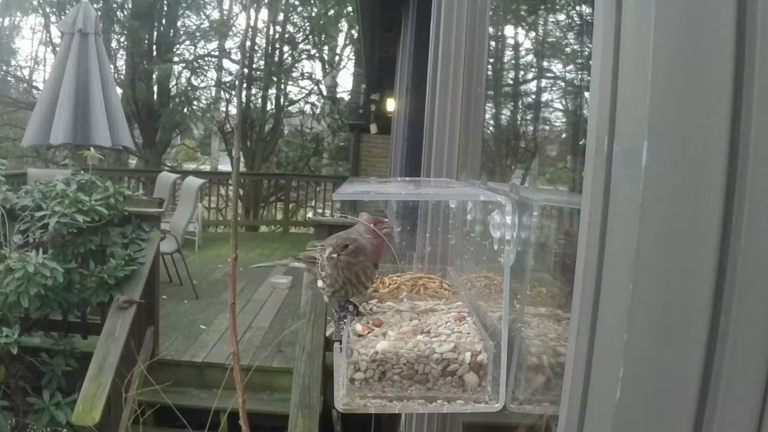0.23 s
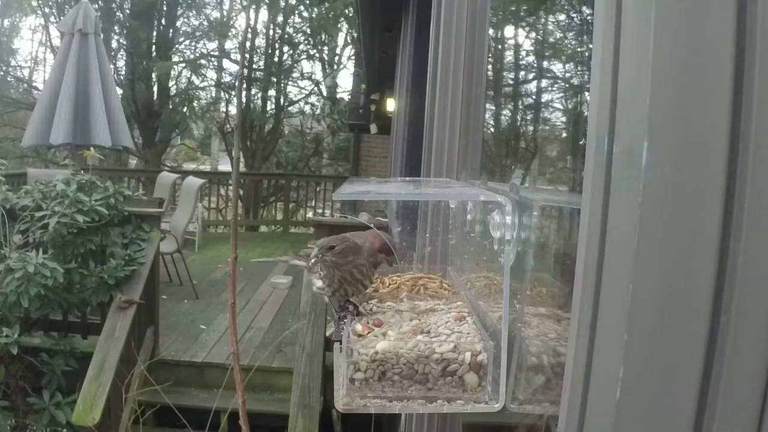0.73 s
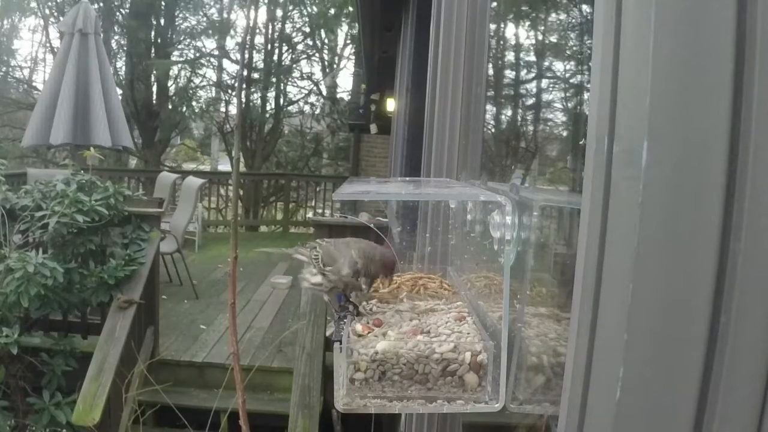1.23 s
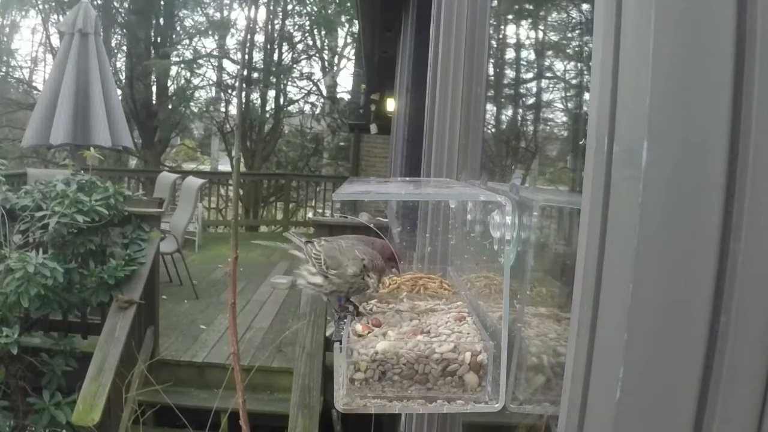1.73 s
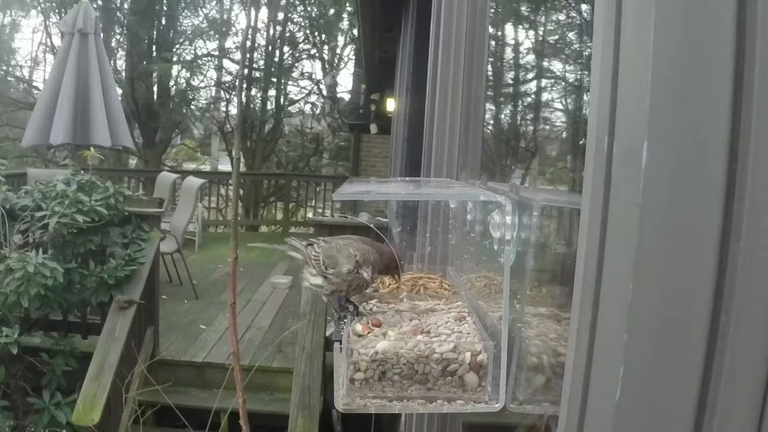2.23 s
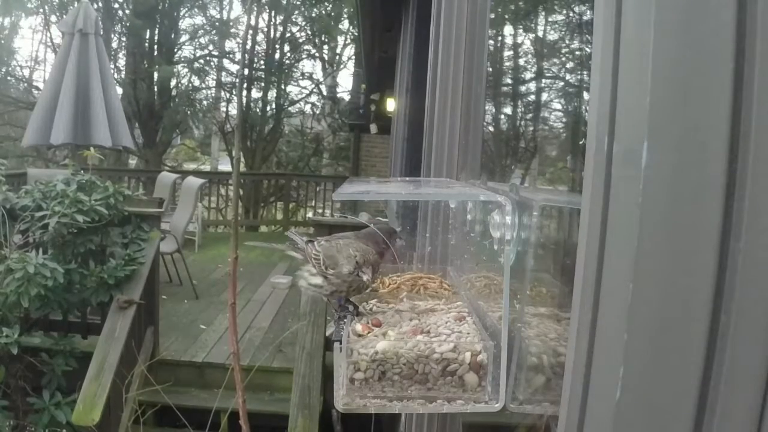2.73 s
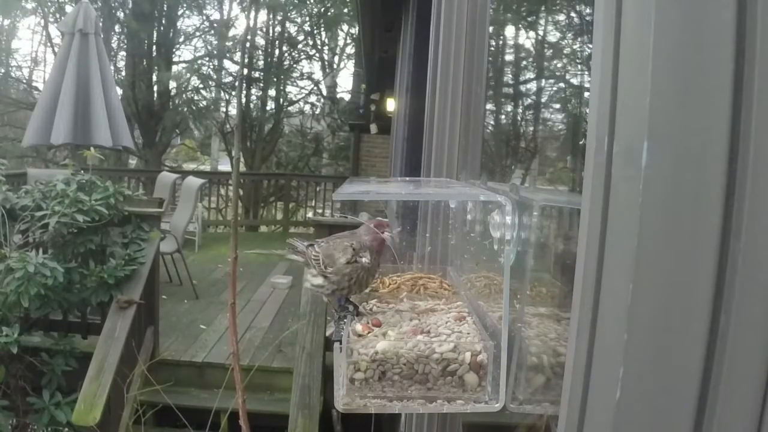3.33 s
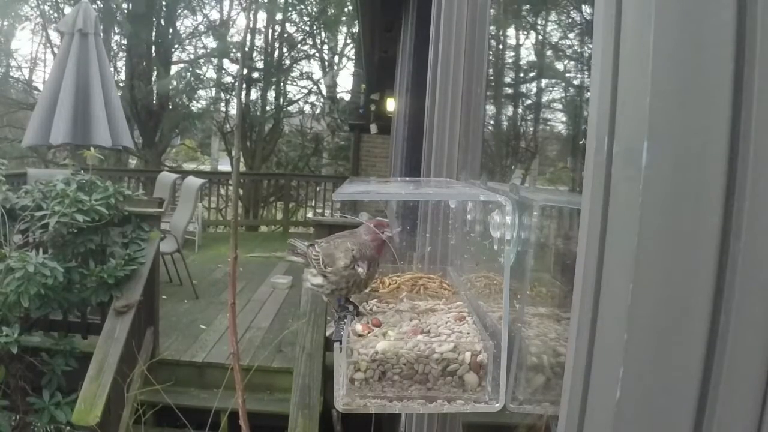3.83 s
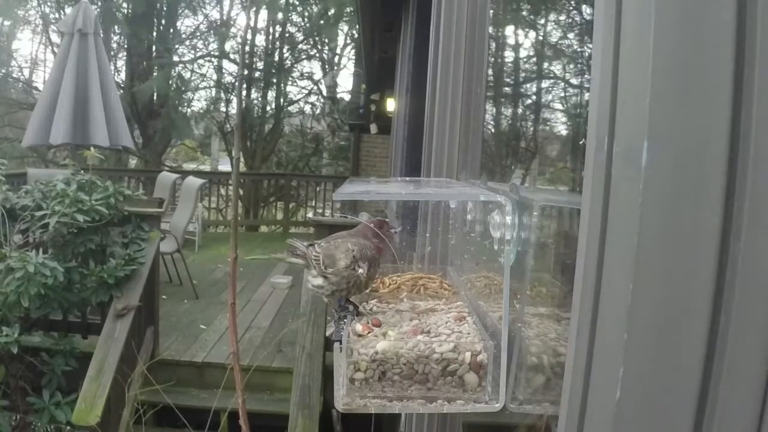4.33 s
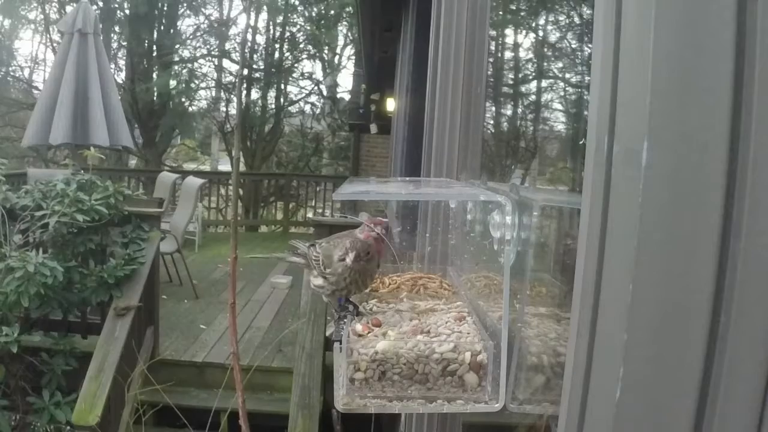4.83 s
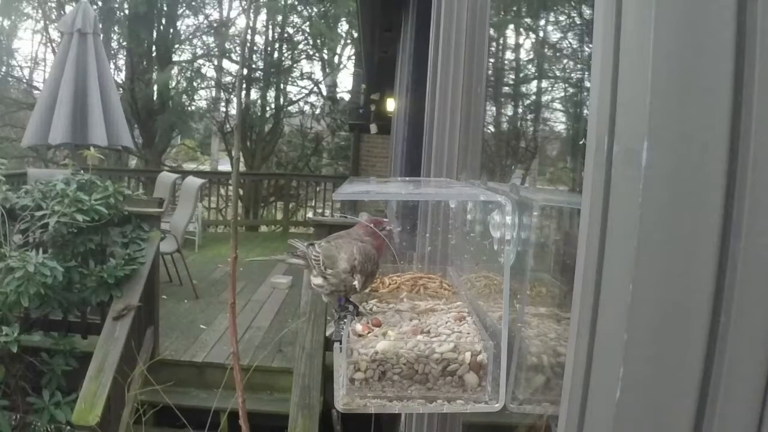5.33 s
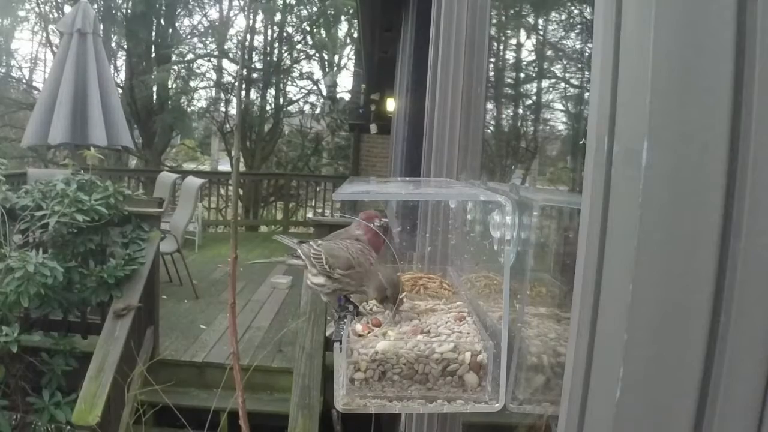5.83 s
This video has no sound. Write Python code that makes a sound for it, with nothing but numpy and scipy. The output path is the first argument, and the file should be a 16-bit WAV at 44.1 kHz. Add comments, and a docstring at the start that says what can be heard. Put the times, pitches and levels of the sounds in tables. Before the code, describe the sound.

Throughout, a low motor hum and dull indoor air sit quietly behind a close plastic seed tray. At about 0.1 s a sharp beak tap lands, with two more near 0.27 s and tiny ticks around them. A very short, soft gliding chirp comes at 1.26 s, while a low rumble rises, peaks near 1.95 s and fades by 2.7 s. Light seed ticks patter from 1.8 s and at 2.4 s. From 2.6 to 2.7 s comes a tight burst of hard pecks and gritty scrapes, with a brief plastic ring. A short scrape with ticks follows at 3.4 s, then barely audible high chirps at 3.9 s and loose ticks from 4.0 s. Scraping builds from 4.28 s to the loudest crack at 4.39 s, then more scrapes and pecks until 4.57 s. The background ducks and recovers; a tick at 5.14 s and an almost inaudible falling chirp at 5.9 s finish.

```python
"""A finch feeds in a clear plastic tray stuck to a window, heard from indoors over motor hum and room air.
Sharp pecks open the scene; light ticks follow, then a gliding chirp and a low rumble that swells and fades.
Pecks and scrapes return in two denser bursts, with tiny high chirps in between; a last faint chirp ends it.
Contacts are short forces ringing the tray's modes, the free roof is one slow mode, chirps are gliding tones.
The recorder's gain ducks when a bright peak passes its ceiling, then creeps back."""
import sys
import numpy as np
from scipy import signal
from scipy.fft import rfft, irfft
from scipy.io import wavfile
from scipy.ndimage import uniform_filter1d, minimum_filter1d

SR = 44100
rng = np.random.default_rng(int(sys.argv[2]) if len(sys.argv) > 2 else 0)


def store_wav(level_fs):
    """Save 16-bit WAV to argv[1]."""
    pcm = np.round(np.clip(np.atleast_2d(level_fs), -1, 1) * 32767)
    wavfile.write(sys.argv[1], SR, pcm.T.astype(np.int16))


N = 267951
TIME = np.arange(N) / SR
CUTOFF_HZ = 15600   # the recorder's steep top cut


def from_db(db):
    """Turn decibels into an amplitude factor."""
    return 10 ** (np.asarray(db) / 20)


def rms_one(x):
    """Scale a steady sound to rms 1."""
    return x / np.sqrt(np.mean(x ** 2) + 1e-20)


def unit_energy(x):
    """Scale a short sound to a summed energy of 1."""
    return x / np.sqrt(np.sum(x ** 2) + 1e-20)


def add(track, start_s, sound):
    """Mix a sound into the track at the given time."""
    at = int(round(start_s * SR))
    track[at:at + len(sound)] += sound[:N - at]


def band(x, hz, kind, order=2):
    """Causal Butterworth filter."""
    return signal.sosfilt(signal.butter(order, hz, kind, fs=SR, output="sos"), x)


def coloured_noise(spectrum):
    """Noise of rms 1 whose spectrum joins the given points."""
    hz, level_db = np.transpose(spectrum)
    bins_hz = np.maximum(np.arange(N // 2 + 1) * SR / N, 1)
    curve_db = np.interp(np.log(bins_hz), np.log(hz), level_db)
    white = rfft(rng.standard_normal(N))
    return rms_one(irfft(white * from_db(curve_db), N))


def drift(per_s):
    """A slow random wander of spread 1, with the given number of turning points per second."""
    return rms_one(np.interp(TIME * per_s, np.arange(400), rng.standard_normal(400)))


# Colour of the room's air. Each row: frequency in Hz, density in relative dB.
AIR_SPECTRUM = [(15, -4), (30, -4), (95, -4.5), (140, -1), (195, -8.5), (390, -12.5), (480, -6),
                (570, -14.5), (1020, -10), (1400, -30.5), (2000, -27.5), (2800, -37), (6200, -39.5),
                (13500, -55)]
AIR_DB = -39   # rms level before the top is rolled off


def room_air(top_hz=14300):
    """Steady coloured noise with its top rolled off stands for the air of the room."""
    return from_db(AIR_DB) * band(coloured_noise(AIR_SPECTRUM), top_hz, "low", order=6)


# Hum of a motor indoors. Each row: frequency in Hz, mean level in dB rms.
MOTOR_HUM = [(119, -54), (131.5, -51), (236.2, -48), (304, -60.5), (400, -60)]


def motor_hum(waver_db=1.4, wander_rad=0.58):
    """Each hum tone wavers slowly and independently in level and phase."""
    hum = np.zeros(N)
    for hz, db in MOTOR_HUM:
        level = np.sqrt(2) * from_db(db + waver_db * drift(5.045))   # root 2 turns rms into peak
        hum += level * np.sin(2 * np.pi * hz * TIME + wander_rad * drift(6))
    return hum


# Swell of the low rumble. Each row: time in seconds, level in dB rms.
RUMBLE_SWELL = [(0, -61.5), (1.2, -47), (1.6, -45), (1.95, -38), (2.3, -45.5), (2.7, -54), (6.08, -70)]


def rumble():
    """Low band-passed noise swells and fades."""
    noise = rms_one(band(rng.standard_normal(N), [22, 105], "band"))
    return from_db(np.interp(TIME, *np.transpose(RUMBLE_SWELL))) * noise


# Small chirps. Each row: start in seconds, length in seconds, start, middle and end pitch in Hz, level in dB.
CHIRP_GLIDES = [(1.263, 0.034, 2350, 3110, 2900, -48.5), (3.876, .022, 6300, 7000, 7200, -65),
                (3.924, .030, 8000, 7850, 7700, -64), (5.914, 0.1, 4180, 3740, 3250, -73)]
# Overtones of a chirp. Each row: multiple of the pitch, level in dB against the chirp's level.
CHIRP_OVERTONES = [(1, 2), (2, -9), (3, -6.5)]


def chirps():
    """Short whistles glide through three pitches, with overtones, under a half-sine swell."""
    out = np.zeros(N)
    for s, length_s, start_hz, middle_hz, end_hz, db in CHIRP_GLIDES:
        u = np.linspace(0, 1, int(length_s * SR))   # progress through the chirp
        glide = np.polyfit([0, .5, 1], [start_hz, middle_hz, end_hz], 2)
        phase = 2 * np.pi * np.cumsum(np.polyval(glide, u)) / SR
        tone = np.zeros(len(u))
        for multiple, tone_db in CHIRP_OVERTONES:
            if multiple * middle_hz < 10000:
                tone += from_db(tone_db) * np.sin(round(multiple) * phase)
        add(out, s, from_db(db) * np.sin(np.pi * u) * tone)
    return out


# Modes of the tray, damped by its load of seed.
# Each row: central frequency in Hz, central strength in relative dB, decay by 60 dB in seconds.
TRAY_MODES = [(380, -16, 0.011), (604, -9, 0.015), (821, -4.5, 0.027), (958, -3, 0.034), (1092, -1.5, 0.01),
              (1578, -0.5, 0.019), (2072, -2, 0.024), (2306, -4, 0.013), (2692, -4, 0.024),
              (3013, -2, 0.015), (3600, -1, 0.013), (4345, -1, 0.0073), (4940, -1.5, .017),
              (5550, -3, 0.016), (6065, 0.5, 0.0083), (7020, -1, 0.0035), (9020, -2.5, 0.0044),
              (9930, -3, 0.0044), (11540, -5, 0.0034), (13140, -6.5, .002)]


def tray_response(pitch_hz, favour_db=7.5, favour_octaves=0.26, vary_db=1.5, detune=0.021, snap=0.99,
                  tail_db=-17.0, tail_t60=0.049, tail_hz=4500):
    """The tray's answer to one touch: the place of contact favours the modes near one pitch."""
    t = np.arange(SR // 4) / SR
    hz, level_db, t60 = np.transpose(TRAY_MODES)[:, :, None]
    near = np.exp(-(np.log2(hz / pitch_hz) / favour_octaves) ** 2)
    strength = from_db(level_db + favour_db * near + vary_db * rng.standard_normal(hz.shape))
    loaded_hz = hz * (1 + detune * rng.standard_normal(hz.shape))   # shifting seed pulls the modes
    sign = (-1) ** np.arange(len(hz))[:, None]
    ringing = sign * strength * np.sin(2 * np.pi * loaded_hz * t) * from_db(-60 * t / t60)
    modes = np.sum(ringing, axis=0)
    modes[0] += snap   # the contact itself
    # reflections between pane and walls leave a short, dull tail
    tail = band(rng.standard_normal(len(t)), tail_hz, "low")
    tail *= from_db(-60 * t / tail_t60) * (1 - np.exp(-t / 0.0014))
    return unit_energy(modes) + from_db(tail_db) * unit_energy(tail)


# Edges between thud, knock, clack, crack and sizzle. Each entry: frequency in Hz.
EDGES_HZ = [1250, 2450, 3900, 7500]


def sound_tray(force, pitch_hz, register_db):
    """Ring the tray with a force, split it into five registers and set their levels around the knock."""
    rest = signal.fftconvolve(force, tray_response(pitch_hz))
    registers = []
    for edge_hz in EDGES_HZ:
        # both halves of a crossover are filtered twice to stay in phase
        registers.append(band(band(rest, edge_hz, "low"), edge_hz, "low"))
        rest = band(band(rest, edge_hz, "high"), edge_hz, "high")
    registers.append(band(rest, EDGES_HZ[-1], "high"))
    thud_db, *upper_db = register_db
    levels_db = [thud_db, 0, *upper_db]   # the knock is the reference
    return sum(from_db(db) * unit_energy(part) for db, part in zip(levels_db, registers))


# Clack, crack and sizzle of a contact.
# Each row: base level in dB against the knock, dB gained per dB of hardness.
UPPER_LEVELS = [(-2.5, 0.29), (-4, 1), (-15, 1.49)]
CLACK_DB_PER_OCTAVE, WALL_HZ = 11.5, 1930   # a spot tuned above the wall's usual pitch clacks more


def registers_db(pitch_hz, thud_db, hardness_db):
    """The harder the contact, the more it lifts the upper registers, the highest most."""
    clack, crack, sizzle = (db + share * hardness_db for db, share in UPPER_LEVELS)
    clack += CLACK_DB_PER_OCTAVE * np.log2(pitch_hz / WALL_HZ)
    return thud_db, clack, crack, sizzle


def taps(rows, chatter=0.69, chatter_s=0.00075, blow_hz=6000, level_db=0.0):
    """Each tap is one slightly soft blow; bright chatter swells and dies in the next few milliseconds."""
    out = np.zeros(N)
    t = np.arange(SR // 100) / SR
    blow = unit_energy(band(signal.unit_impulse(len(t)), blow_hz, "low"))
    for s, db, pitch_hz, thud_db, hardness_db in rows:
        rattle = unit_energy(rng.standard_normal(len(t)) * t * np.exp(-t / chatter_s))
        colour = registers_db(pitch_hz, thud_db, hardness_db)
        sound = sound_tray(blow + chatter * rattle, pitch_hz, colour)
        add(out, s, from_db(db + level_db) * np.sqrt(len(t)) * sound)   # knock level counts over 10 ms
    return out


# Light ticks of seed, husks and claws. Each row: start in seconds, knock in dB over 10 ms before the
# tick trim, thud in dB against the knock, hardness in dB.
LIGHT_TICKS = [(0.2265, -42, 2, -2), (0.2328, -42.5, 0, 1.5), (0.2884, -44.5, -7, 12),
               (0.2975, -46, -14, -6), (1.2643, -50, 4, -2), (1.296, -50.5, -1, 1.5),
               (1.519, -53.5, -7, 0.5), (1.7969, -38, -4, -9.5), (1.8164, -43.5, 0, -10),
               (1.835, -37.5, -6, -8.5), (1.9175, -42.5, 4.5, -3.5), (2.39, -35, -3, -3.5),
               (2.405, -35.5, -9, -5.5), (2.414, -41.5, 1, -1), (2.424, -34.5, -18, -3.5),
               (2.47, -49.5, -4, 1), (2.59, -44, 2, 5), (2.6, -44, -6, 1), (2.6384, -42, -6, 4),
               (2.76, -43, 7, -11), (2.773, -44, 9.5, -7), (2.8815, -45, -17, -18), (3.047, -50, 3, -8),
               (3.4544, -36, -9, -10), (3.467, -41, -16, -5), (3.476, -37.5, -20, -11),
               (3.806, -43.5, 5, -6.5), (3.816, -43.5, 7.5, -3.5), (4.009, -36.5, 2.5, -5),
               (4.044, -40, 5.5, -7), (4.115, -44.5, 11, -2.5), (4.122, -47, 8, -6),
               (4.16, -44.5, 2.5, -6.5), (4.227, -39.5, 1, -7), (5.1373, -39, -16, -7),
               (5.961, -51, -7, -14)]
TICK_HZ = 2000   # favoured pitch of every tick
SETTLE_WAIT_S, SETTLE_SPREAD_S = 0.014, 0.044   # shortest wait after a peck, and its random extra
SETTLE_DB, HUSK_DB, HUSK_SPREAD_DB = -48, -58.5, 3   # knock levels before the tick trim, husk spread
LOOSE_THUD_DB, LOOSE_HARDNESS_DB = -4, -5   # colour of loose seed and husks landing


def light_ticks(husk_count=10, trim_db=0.5):
    """Light ticks of seed and claws at the feeder; seed settles after each peck and stray husks drop."""
    loose = []
    for s, *_ in PECK_HITS:
        loose.append((s + SETTLE_WAIT_S + SETTLE_SPREAD_S * rng.random(), SETTLE_DB))
    for _ in range(husk_count):
        husk_s = rng.random() * TIME[-1]
        loose.append((husk_s, HUSK_DB + HUSK_SPREAD_DB * rng.standard_normal()))
    landings = [(s, db, LOOSE_THUD_DB, LOOSE_HARDNESS_DB) for s, db in loose]
    rows = [(s, db, TICK_HZ, thud_db, hardness_db)
            for s, db, thud_db, hardness_db in [*LIGHT_TICKS, *landings]]
    return taps(rows, chatter=0.64, chatter_s=0.0019, level_db=trim_db)


# A few blows reach the feeder's free roof. Each row: start in seconds, starting peak level in dB.
ROOF_HITS = [(0.2767, -41), (2.706, -29.5), (4.564, -38.5)]
ROOF_HZ, ROOF_T60_S = 1830, 0.25


def roof():
    """The roof carries no seed, so its one mode dies away slowly."""
    out = np.zeros(N)
    t = np.arange(SR // 2) / SR
    for s, db in ROOF_HITS:
        add(out, s, from_db(db - 60 * t / ROOF_T60_S) * np.sin(2 * np.pi * ROOF_HZ * t))
    return out


# Beak and claws sliding over plastic and seed. Each row: start in seconds, length in seconds,
# knock in dB before the scrape trim, hardness in dB.
SCRAPE_STROKES = [(0.047, 0.013, -32.5, 1), (2.37, 0.056, -45, -4.5), (2.61, 0.0057, -31, -9),
                  (2.621, 0.012, -40, 19.5), (2.673, 0.013, -38.5, 17), (2.687, 0.0056, -22.5, 6),
                  (2.717, 0.013, -31.5, -7), (3.413, 0.018, -29, 7.5), (3.426, 0.0081, -24, -1),
                  (4.278, 0.018, -34.5, -11), (4.301, 0.044, -32, -5), (4.3447, 0.011, -26.5, 4),
                  (4.3833, 0.0035, -21, 2.5), (4.398, 0.069, -27.5, 5.5), (4.471, 0.036, -27, -3.5),
                  (4.514, 0.0061, -30.5, 11), (4.529, 0.018, -29, 2)]
SCRAPE_HZ, SCRAPE_THUD_DB = 2150, -7.5   # favoured pitch, and thud against the knock
SCRAPE_FADE_DB_PER_S = 66.5   # the pressure eases along a stroke


def scrapes(slips_per_s=1500, uneven_db=3.0, catch_db=0.5, catches_per_s=450, trim_db=-1.0):
    """A scrape is a dense run of tiny slips whose strength wavers as the tip catches and lets go."""
    out = np.zeros(N)
    for s, length_s, db, hardness_db in SCRAPE_STROKES:
        n = int(length_s * SR)
        t = np.arange(n) / SR
        grip_db = catch_db * np.interp(t * catches_per_s, np.arange(64), rng.standard_normal(64))
        slip_now = rng.random(n) < slips_per_s / SR
        slips = slip_now * from_db(uneven_db * rng.standard_normal(n)) * rng.choice([-1, 1], n)
        rub = .1 * rng.standard_normal(n)   # fine grain between the slips
        pressure = from_db(grip_db - SCRAPE_FADE_DB_PER_S * t) * signal.windows.tukey(n, .3)
        colour = registers_db(SCRAPE_HZ, SCRAPE_THUD_DB, hardness_db)
        sound = sound_tray((slips + rub) * pressure, SCRAPE_HZ, colour)
        add(out, s, from_db(db + trim_db) * np.sqrt(n) * sound)   # knock level counts over the stroke
    return out


# The beak strikes the tray. Each row: start in seconds, knock in dB over 10 ms, favoured pitch in Hz,
# thud in dB against the knock, hardness in dB.
PECK_HITS = [(0.0797, -33, 2720, -1.5, 10), (0.0806, -18, 3170, -9.5, -6.5), (0.2611, -20, 2130, -10, 0.5),
             (0.266, -40, 2000, -15, -4), (0.2752, -21.5, 1000, -6.5, -7), (2.617, -26.5, 1630, -11, 0.5),
             (2.6629, -12.5, 1880, -33, 1.5), (2.669, -34, 2060, -5, 11), (2.699, -36.5, 1640, -22, 8),
             (2.7054, -16.5, 2510, -5, 2), (4.3864, -4, 1630, -5.5, 2.5), (4.521, -13.5, 1780, -39.5, -5.5),
             (4.562, -35, 2930, -9, 13.5), (4.57, -24, 1640, -24, -1.5)]


def pecks():
    """Each beak strike is a short blow with chatter that rings the tray's modes."""
    return taps(PECK_HITS)


def scene():
    """The feeder and the chirps outside the pane, over the hum of the room."""
    background = room_air() + motor_hum() + rumble() + chirps()
    feeder = light_ticks() + roof() + scrapes() + pecks()
    return (background + feeder)[None, :]


def gain_control(x, ceiling_db=-19.5, deepest_db=12, hold_s=0.15, release_db_per_s=16.0, sense_hz=4500):
    """The gain drops at once when a bright peak passes the ceiling, holds, then climbs back."""
    power = uniform_filter1d(band(x, sense_hz, "high") ** 2, SR // 200)   # averaged over 5 ms
    level_db = 10 * np.log10(np.maximum(power, 1e-12))
    over_db = np.clip(level_db - ceiling_db, 0, deepest_db)
    hold = int(hold_s * SR) | 1   # an odd number of samples
    held_db = -minimum_filter1d(-over_db, hold, origin=hold // 2)   # highest overshoot of the hold time
    release_db = release_db_per_s * TIME
    cut_db = np.maximum.accumulate(held_db + release_db) - release_db
    return x * from_db(-cut_db)


def record(dry, microphone_top_hz=14800):
    """A microphone with a soft top, gain control, overload at full scale and a steep top cut."""
    heard = band(dry[0], microphone_top_hz, "low")
    loud = np.clip(gain_control(heard), -1, 1)
    top_cut = signal.ellip(10, .2, 80, CUTOFF_HZ, fs=SR, output="sos")
    return signal.sosfilt(top_cut, loud)[None, :]


dry = scene()
out = record(dry)
store_wav(out)
```